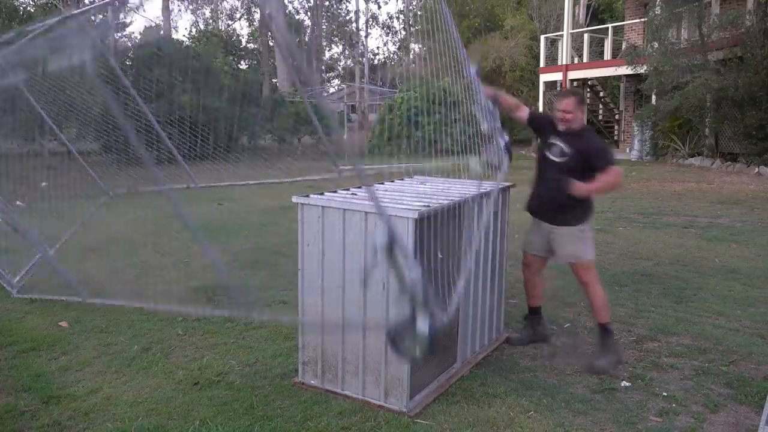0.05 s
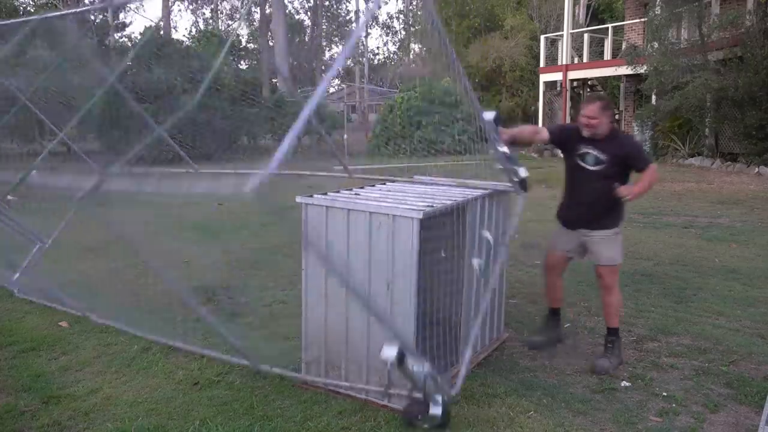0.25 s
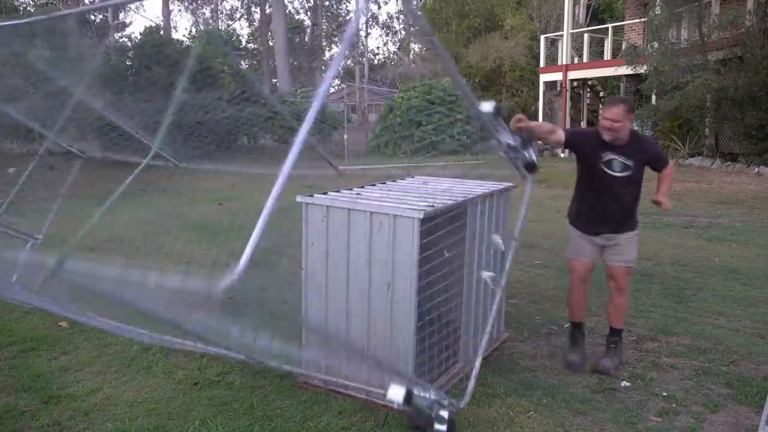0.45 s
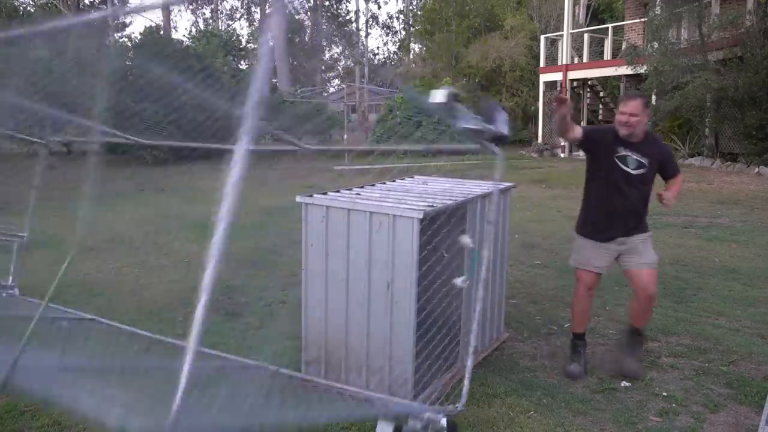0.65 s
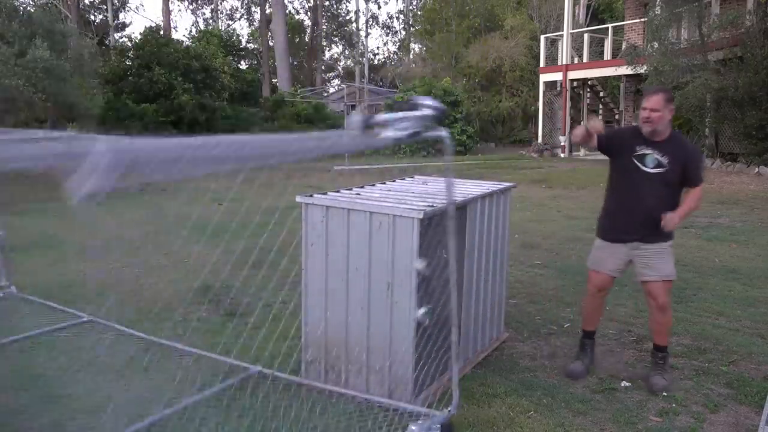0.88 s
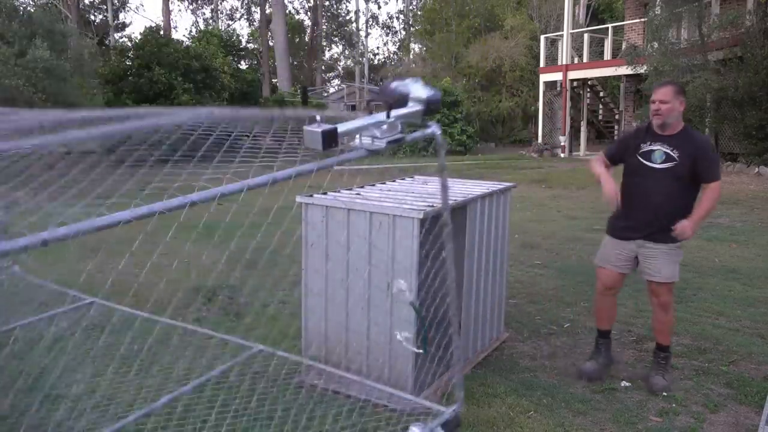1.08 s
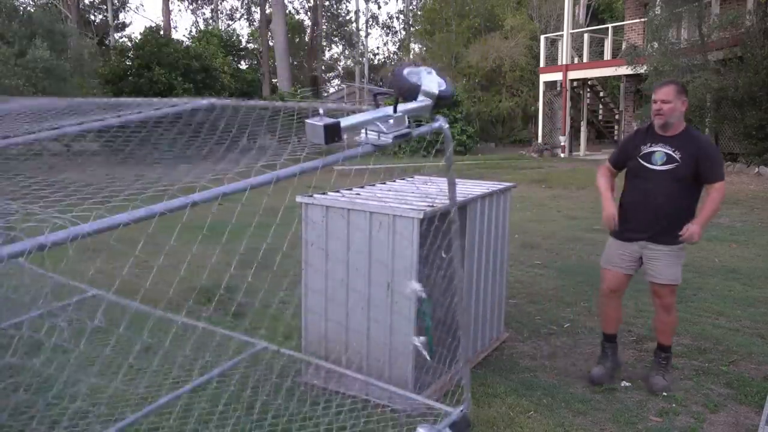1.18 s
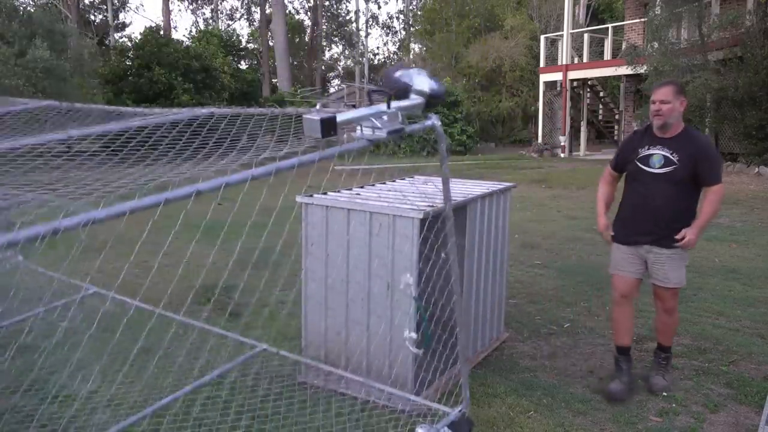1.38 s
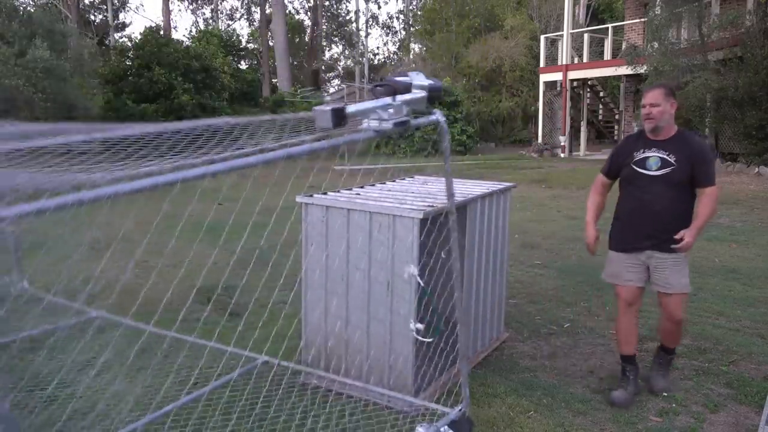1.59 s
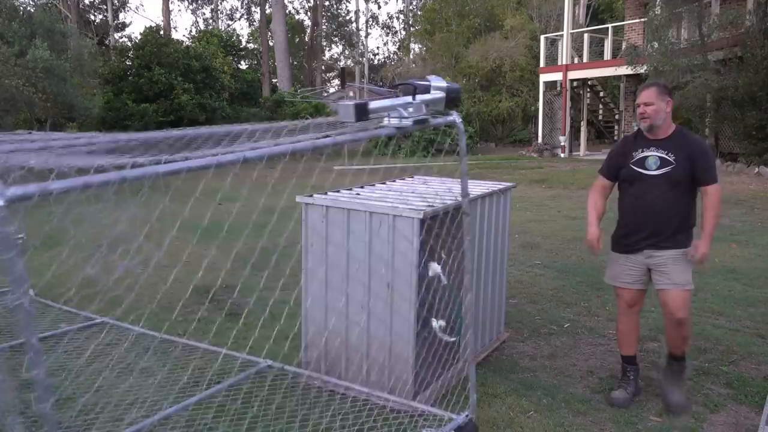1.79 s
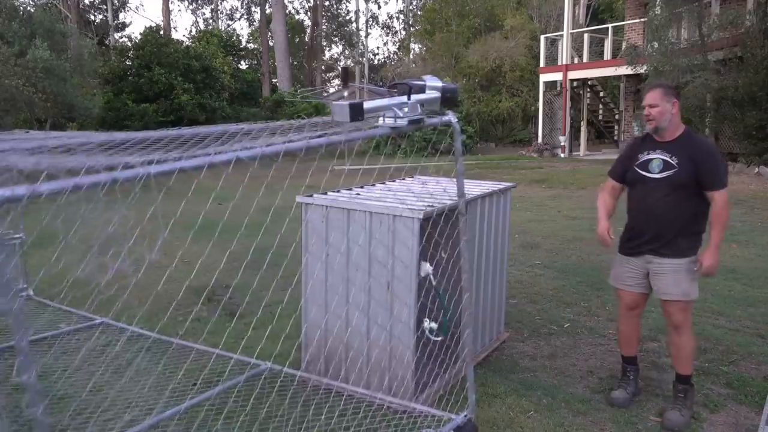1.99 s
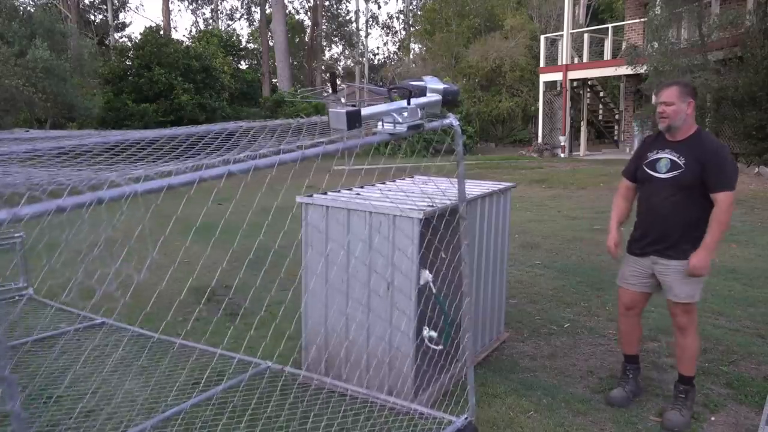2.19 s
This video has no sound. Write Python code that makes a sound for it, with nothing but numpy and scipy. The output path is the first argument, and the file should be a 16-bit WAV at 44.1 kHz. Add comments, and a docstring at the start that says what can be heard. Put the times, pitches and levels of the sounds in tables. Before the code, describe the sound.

A frame of steel tubes and wire mesh topples over a metal box, crashing and scraping first, then landing with clanks, jangling mesh and ringing tubes, a few metres away on the left, in a quiet yard.

```python
"""On a lawn, a few metres away and to the left, a frame of steel tubes and wire mesh topples over a metal box.
One edge crashes and drags along the ground (wire clicks and rumbling noise), then the frame lands.
The mesh jangles (many random wire clicks), tubes knock (noise bursts and fading tones) and loose tubes ring
(wavering sines). It shakes once more as it settles. Trees and a house return a faint echo (fading noise)
over quiet outdoor air (coloured noise)."""
import sys
import numpy as np
from scipy import signal
from scipy.fft import rfft, irfft
from scipy.io import wavfile
from scipy.ndimage import uniform_filter1d

SR = 44100
rng = np.random.default_rng(int(sys.argv[2]) if len(sys.argv) > 2 else 0)


def output_pcm(signal):
    """Save a mono or channel-first signal as 16-bit PCM at the path in sys.argv[1].

    Samples are clipped to [-1, 1] before scaling.
    """
    pcm = np.clip(np.atleast_2d(signal).T, -1, 1) * 32767
    wavfile.write(sys.argv[1], SR, np.round(pcm).astype(np.int16))


N = 99225
T = np.arange(N) / SR  # time in seconds
TOP_HZ = 15800  # upper limit of the recorder, also of the noise in a blow


def undb(db):
    """Turn decibels into a gain."""
    return 10 ** (np.asarray(db) / 20)


def unit(x):
    """Scale to rms 1."""
    return x / np.sqrt(np.mean(x ** 2))


def fade(t, t60):
    """Exponential decay from t = 0, down 60 dB after t60 seconds; silent before."""
    return (t >= 0) * np.exp(-np.log(1000) * np.maximum(t, 0) / max(t60, .002))


def swell(start, db, hold, t60, rise):
    """Gain that rises, holds and dies away."""
    attack = np.clip((T - start) / rise, 0, 1) ** 2
    return undb(db) * attack * fade(np.maximum(T - start - rise - hold, 0), t60)


def walk(rate):
    """Slow random drift with rms 1, taking about `rate` new values per second."""
    k = int(SR / rate)
    steps = np.repeat(rng.standard_normal(N // k + 1), k)
    smooth = uniform_filter1d(uniform_filter1d(steps, k), k)
    return unit(smooth[:N])


def through(x, response):
    """Pass x through an impulse response scaled to unit energy."""
    return signal.fftconvolve(x, response / np.linalg.norm(response))[:N]


def colour(x, points):
    """Shape the spectrum along (Hz, dB) points, with a filter that never sounds ahead of its input."""
    hz, db = np.array(points).T
    f = np.maximum(np.fft.rfftfreq(4096, 1 / SR), 1)
    cepstrum = irfft(np.log(undb(np.interp(np.log(f), np.log(hz), db))))
    # folding the cepstrum forward in time gives minimum phase
    cepstrum[1:2048] *= 2
    cepstrum[2049:] = 0
    return through(x, irfft(np.exp(rfft(cepstrum))))


def cut(x, hz, kind, order=2):
    """Butterworth filter: kind "low" keeps what is below hz, "high" what is above."""
    return signal.sosfilt(signal.butter(order, hz, kind, fs=SR, output="sos"), x)


# Tone colour of the outdoor air. Each row: frequency in Hz, relative strength in dB.
AIR_COLOUR = [(15, -19), (25, 1.5), (567, -7), (1110, -10), (3830, -17.5), (15500, -24)]
AIR_DB = -50.5  # middle of its slowly drifting level


def air():
    """Quiet outdoor background: coloured noise whose level drifts slowly."""
    noise = unit(colour(rng.standard_normal(N), AIR_COLOUR))
    return noise * undb(AIR_DB + walk(4.36))


YARD_T60_S, YARD_DB, YARD_HZ, YARD_DELAY_S = 1, -19.5, 3530, 0.031


def yard(x):
    """Dull, faint echo from trees and house: a delayed, fading tail of noise with softened treble."""
    tail = rng.standard_normal(N) * fade(T - YARD_DELAY_S, YARD_T60_S)
    return undb(YARD_DB) * through(x, cut(tail, YARD_HZ, "low", order=1))


# Ways the whole frame and box vibrate. Each entry: frequency in Hz.
FRAME = [322, 420, 480, 592, 730, 833, 994, 1174, 1330, 1425, 1633, 3522]
FRAME_T60_S, FRAME_DB = .18, -24


def frame(x):
    """The whole frame and the box ring on after every contact, as a set of fading sines."""
    modes = sum(np.sin(2 * np.pi * (hz * T + rng.random())) for hz in FRAME)
    return x + undb(FRAME_DB) * through(x, modes * fade(T, FRAME_T60_S))


# Loose tubes set ringing. Each row: start in seconds, level in dB, pitch in Hz, t60 (60 dB decay) in seconds.
RINGS = [(0.942, -28.5, 2783, .22), (0.97, -29.5, 2957, .2), (1.002, -28, 2715, .42),
         (1.084, -32.5, 2738, .38), (1.146, -41, 5060, .5), (1.226, -32.5, 2700, .25),
         (1.238, -35, 2955, .35), (1.348, -42, 2750, .3), (1.428, -43.5, 5168, .13),
         (1.441, -33.5, 2682, .3), (1.787, -39.5, 2690, .35), (1.815, -37, 2785, .2), (1.83, -44, 4945, .1),
         (1.866, -36.5, 2702, .85), (1.915, -53, 5160, .15)]
# Ways one tube vibrates, used here and in mesh().
# Each row: frequency in Hz, level in dB, t60 as a share of the base t60 of the ring or tube.
TUBE = [(2690, -1.5, 0.98), (2960, -18, 0.66), (5030, -22, 0.4), (5160, -22, 0.4), (12960, -23, .4)]
RING_RISE_S, RING_HOLD_S = .008, .03  # both counted from the start
RING_WAVER_DB, RING_WAVER_HZ = 1.6, 13  # rms drift of the level and of the main pitch
OVERTONE_SCATTER_DB = 2


def rings():
    """Loose tubes sing at one pitch, wavering a little, over the tube's bright upper modes, then ring out."""
    out = 0
    for start, db, pitch, t60 in RINGS:
        t = T - start
        # a clock that runs unevenly makes all the pitches waver together
        clock = T + np.cumsum(RING_WAVER_HZ / pitch * walk(60.2)) / SR
        modes = [(pitch, 0, 1)] + [mode for mode in TUBE if mode[0] > np.sqrt(2) * pitch]
        chances = rng.standard_normal((len(modes), 2))
        ring = 0
        for (hz, mode_db, share), (scatter, phase) in zip(modes, chances):
            gain = undb(mode_db + OVERTONE_SCATTER_DB * scatter * (hz > pitch))
            tone = np.sin(2 * np.pi * (hz * clock + phase))
            ring = ring + gain * tone * fade(np.maximum(t - RING_HOLD_S, 0), t60 * share)
        rise = np.clip(t / RING_RISE_S, 0, 1)
        out = out + np.sqrt(2) * ring * rise * undb(db + RING_WAVER_DB * walk(140))
    return out


WIRE_T60_S = 0.048
WIRE_TICK = 5.2  # strength added to the first sample of each wire's ring


def wires(per_s, scatter_db, count=14):
    """Many wires click at random, each with a tick and a short ring of its own; the level is evened out."""
    out = 0
    for _ in range(count):
        hits = rng.random(N) < per_s / count / SR
        clicks = hits * undb(scatter_db * np.minimum(rng.exponential(size=N), 4))
        ring = rng.standard_normal(N) * fade(T, WIRE_T60_S)
        ring[0] += WIRE_TICK
        out = out + through(clicks * rng.choice([-1, 1], N), ring)
    return out / np.sqrt(uniform_filter1d(out ** 2, SR // 25) + 1e-9)


CROSSOVER_HZ = 3570  # border between body and treble


def clatter(clicks, points, rows, rise):
    """Coloured wire clicks that come in swells, each with its own share of treble."""
    body, treble = 0, 0
    for start, db, hold, t60, treble_db in rows:
        gain = swell(start, db, hold, t60, rise)
        # overlapping swells add as powers
        body = np.hypot(body, gain)
        treble = np.hypot(treble, gain * undb(treble_db))
    sound = colour(clicks, points)
    low = unit(cut(sound, CROSSOVER_HZ, "low", order=3))
    high = unit(cut(sound, CROSSOVER_HZ, "high", order=3))
    return low * body + high * treble


# Shakes of the mesh after the landing. Each row: start in seconds, level in dB, hold in seconds,
# t60 in seconds, treble in dB relative to the level.
SHAKES = [(0.919, -25.5, 0.034, 1, 0), (1.039, -45, 0.0098, 0.2, 17.5), (1.17, -39.5, 0.0061, 0.14, 9.5),
          (1.217, -36.5, 0.0076, 0.67, 0.5), (1.32, -45.5, 0.043, 1, 4.5), (1.485, -46, 0.052, 1, -0.5),
          (1.709, -47, 0.069, 0.63, 1), (1.756, -38.5, 0.057, 0.49, 0), (1.977, -47.5, 0.024, 0.18, -2.5)]
# Tone colour of the jangle. Each row: frequency in Hz, relative strength in dB.
SHAKE_COLOUR = [(100, -18), (200, -6), (650, -1), (1400, 0), (2800, -0.5), (4500, -5), (6000, -11),
                (8500, -12.5), (12000, -20), (15500, -21.5)]
SHAKE_CLICKS_PER_S, SHAKE_SCATTER_DB, SHAKE_RISE_S = 1000, 3.8, .028
TUBE_T60_S, TUBE_DB = 0.4, -21.5  # base t60 and level of the tubes that sing along


def mesh():
    """The shaken mesh jangles against the tubes, which sing along as fading sines."""
    jangle = clatter(wires(SHAKE_CLICKS_PER_S, SHAKE_SCATTER_DB), SHAKE_COLOUR, SHAKES, SHAKE_RISE_S)
    tube = 0
    for hz, db, share in TUBE:
        tube = tube + undb(db) * np.sin(2 * np.pi * hz * T) * fade(T, TUBE_T60_S * share)
    return jangle + undb(TUBE_DB) * through(jangle, tube)


# Scrapes of the falling edge. Each row: start in seconds, level in dB, hold in seconds,
# t60 in seconds, treble in dB relative to the level.
SCRAPES = [(-0.03, -39.5, 0.0091, 0.52, -27), (0.172, -35.5, 0.036, 0.15, -0.5),
           (0.206, -20, 0.055, 0.67, -11), (0.244, -19.5, 0.08, 0.78, -7.5),
           (0.288, -29.5, 0.12, 0.33, 1.5), (0.369, -24, 0.091, 0.084, -8), (0.472, -34.5, 0.03, 1.0, -2.5),
           (0.73, -41.5, 0.047, 1, -5.5)]
# Heaves of the frame and panels that rumble.
# Each row: start in seconds, level in dB, hold in seconds, t60 in seconds.
HEAVES = [(-0.03, -41.5, 0.029, 1.5), (0.198, -23, 0.068, 0.15), (0.312, -24, 0.075, 0.4),
          (0.43, -29, 0.021, 0.39), (0.51, -44.5, 0.29, 1.2), (0.901, -34.5, 0.01, 0.26)]
# Tone colours of the scraping and of the rumble. Each row: frequency in Hz, relative strength in dB.
DRAG_COLOUR = [(88, -9), (170, -7), (270, -6), (550, -4), (900, -5), (1700, -6.5), (3400, -12),
               (7500, -22.5), (11000, -29.5), (15500, -35)]
RUMBLE_COLOUR = [(20, -12), (45, 3.5), (75, 2.5), (165, 4.5), (215, -8), (550, -34.5)]
DRAG_CLICKS_PER_S, DRAG_SCATTER_DB = 1100, 3.0
SWELL_S = 0.015  # rise of every scrape and heave


def drag():
    """The falling edge scrapes and chatters as wire clicks, and the panels rumble as low noise."""
    chatter = clatter(wires(DRAG_CLICKS_PER_S, DRAG_SCATTER_DB), DRAG_COLOUR, SCRAPES, SWELL_S)
    rumble = colour(rng.standard_normal(N), RUMBLE_COLOUR)
    rumble /= np.sqrt(uniform_filter1d(rumble ** 2, SR // 20))  # even out the level
    heave = np.sqrt(sum(swell(*row, SWELL_S) ** 2 for row in HEAVES))
    return chatter + rumble * heave


# Tone colour of the noise in a blow. Each row: frequency in Hz, relative strength in dB.
BLOW_COLOUR = [(100, 0), (400, 1), (1000, -2.5), (4500, -5.5), (15000, -27)]
BLOW_RESONANCE_DB, BLOW_MODES_DB, BLOW_CHATTER_DB, BLOW_CRACK_DB = .5, -2, -2, -2.5
CRACK_T60_S = .008
BLOW_REACH = 6.8  # a blow is dull above BLOW_REACH times its resonance
PANEL_HZ = 1780  # spots pitched above this are small and stiff: they click rather than ring


def clank(hz, t60, count=12):
    """One contact: a sharp crack, brief chatter, the spot's main resonance and inharmonic modes around it."""
    t = T[:N // 8]
    ratios = 2 ** rng.uniform(-1, 1.4, count)
    phases = rng.random(count)
    modes = sum(np.sin(2 * np.pi * (hz * r * t + p)) for r, p in zip(ratios, phases)) * np.sqrt(2 / count)
    main = np.sqrt(2) * np.sin(2 * np.pi * hz * t) / np.hypot(1, (hz / PANEL_HZ) ** 3)
    body = (undb(BLOW_RESONANCE_DB) * main + undb(BLOW_MODES_DB) * modes) * fade(t, t60)
    crack = undb(BLOW_CRACK_DB) * fade(t, CRACK_T60_S)
    chatter = undb(BLOW_CHATTER_DB) * fade(t, t60)
    burst = rng.standard_normal(len(t)) * (crack + chatter)
    burst = cut(colour(burst, BLOW_COLOUR)[:len(t)], hz / 2, "high", order=1)
    return body + cut(burst, min(BLOW_REACH * hz, TOP_HZ), "low")


# Blows of the frame. Each row: start in seconds, level in dB, main resonance in Hz, t60 in seconds.
BLOWS = [(0.182, -35, 1730, 0.06), (0.208, -13, 864, 0.027), (0.2108, -15.5, 1860, 0.034),
         (0.224, -22.5, 915, 0.035), (0.25, -20, 2580, 0.033), (0.263, -25, 2060, 0.04),
         (0.278, -17.5, 1053, 0.05), (0.289, -18.5, 548, 0.029), (0.316, -14, 3450, 0.066),
         (0.4534, -18.5, 1550, 0.061), (0.505, -27, 5500, 0.035), (0.645, -33, 2940, 0.074),
         (0.714, -40, 4460, 0.086), (0.764, -43.5, 3150, 0.12), (0.813, -37, 2970, 0.035),
         (0.933, -30, 167, 0.043), (0.941, -26.5, 1133, 0.14), (0.953, -19, 1748, 0.083),
         (1.004, -30.5, 4630, 0.019), (1.0245, -21, 1532, 0.079), (1.088, -21.5, 1180, 0.042),
         (1.13, -24, 1750, 0.035), (1.433, -30.5, 2710, 0.028), (1.5198, -25.5, 1570, 0.05),
         (1.526, -28.5, 3430, 0.029), (1.556, -35.5, 1257, 0.045), (1.592, -31.5, 3860, 0.028),
         (2.196, -43.5, 1230, 0.035)]


def blows():
    """Tubes knock on each other, the box and the ground, each at a spot with its own resonance."""
    out = 0
    for start, db, hz, t60 in BLOWS:
        placed = np.pad(clank(hz, t60), (int(start * SR), N))[:N]
        out = out + undb(db) * placed
    return out


LEFT_DB, RIGHT_DB = 3.6, -6.3
DIFFUSE_DB, AIR_SIDE_DB = -25, -4.5  # scattered sound and separate air, on the right only


def scene():
    """Nearly the same sound in both channels, louder on the left; the right adds scattered sound and air."""
    metal = frame(drag() + mesh() + blows()) + rings()
    heard = metal + yard(metal) + air()
    scattered = through(heard, rng.standard_normal(N) * fade(T, 0.087))
    diffuse = undb(DIFFUSE_DB) * scattered + undb(AIR_SIDE_DB) * air()
    return np.array([undb(LEFT_DB) * heard, undb(RIGHT_DB) * heard + diffuse])


def record(dry):
    """The recorder clips at full scale, then cuts the top with a steep filter."""
    clipped = np.clip(dry, -1, 1)
    return signal.sosfilt(signal.ellip(10, .2, 80, TOP_HZ, fs=SR, output="sos"), clipped)


dry = scene()
out = record(dry)
output_pcm(out)
```